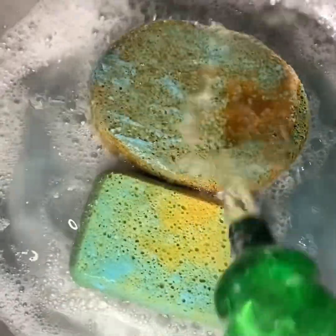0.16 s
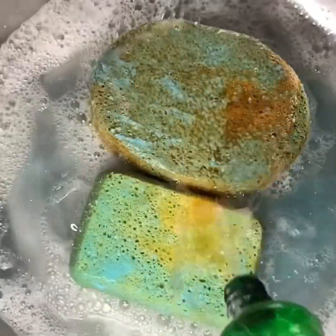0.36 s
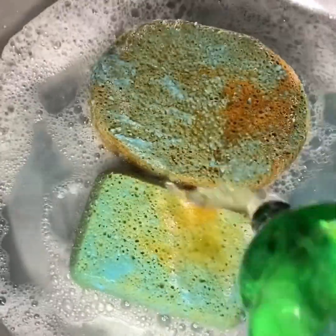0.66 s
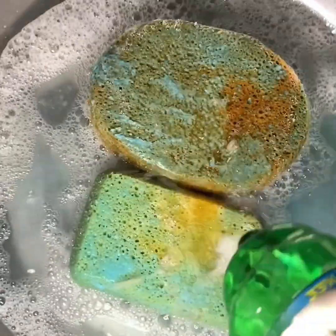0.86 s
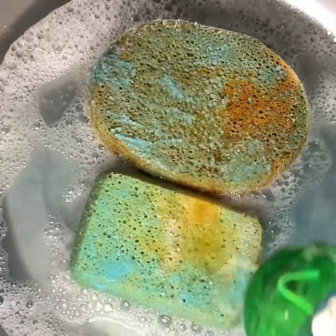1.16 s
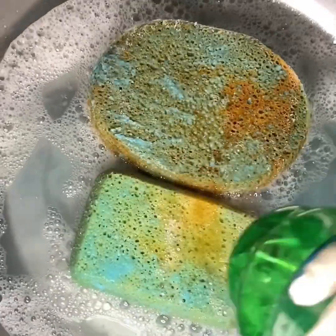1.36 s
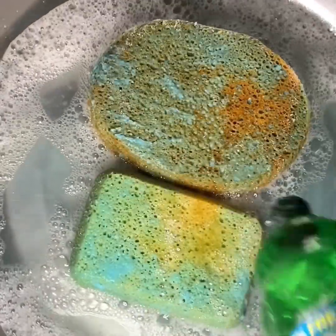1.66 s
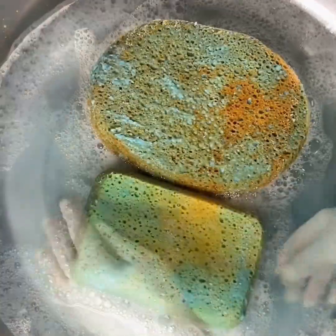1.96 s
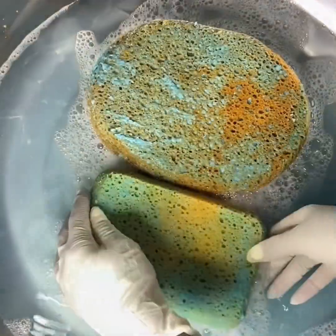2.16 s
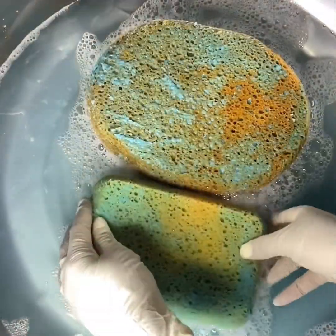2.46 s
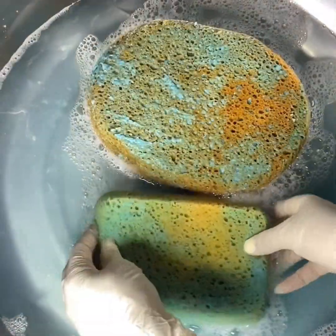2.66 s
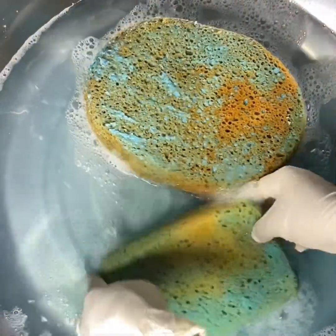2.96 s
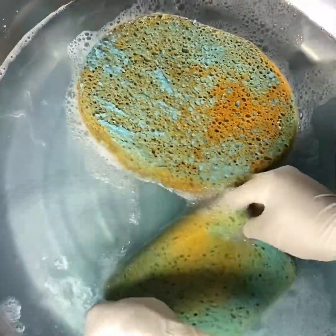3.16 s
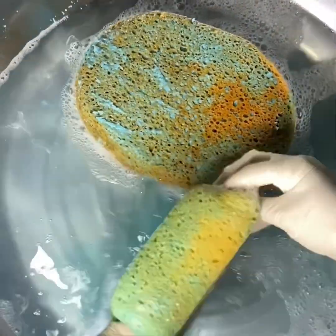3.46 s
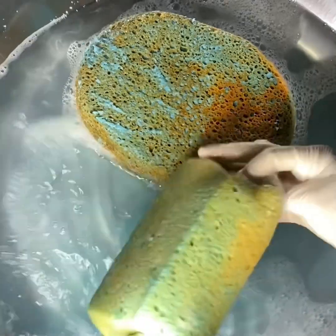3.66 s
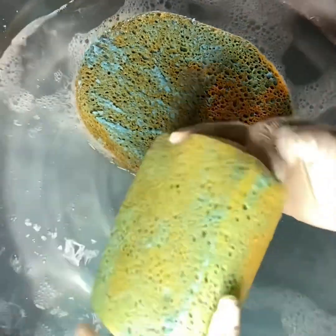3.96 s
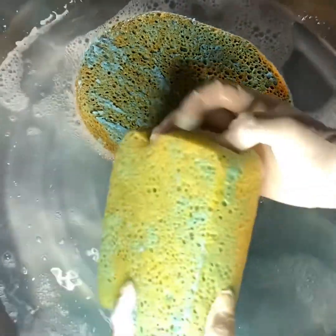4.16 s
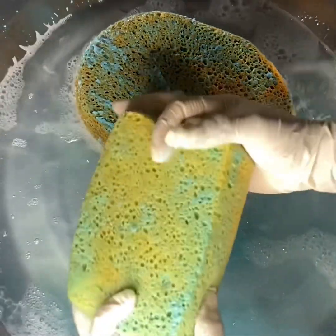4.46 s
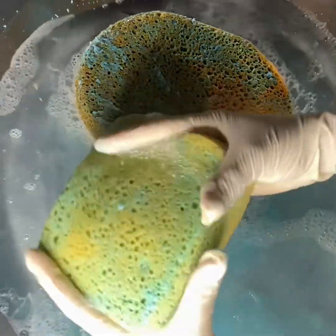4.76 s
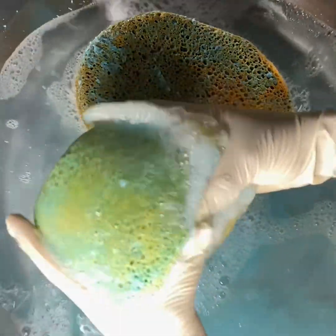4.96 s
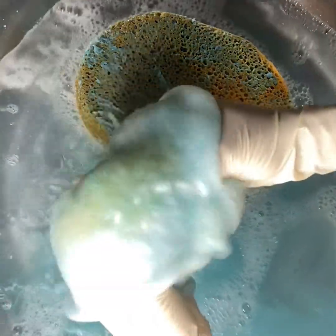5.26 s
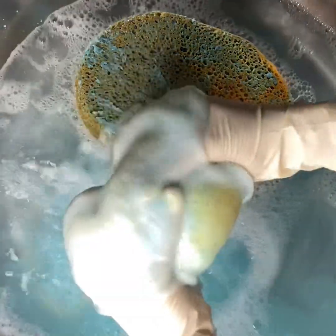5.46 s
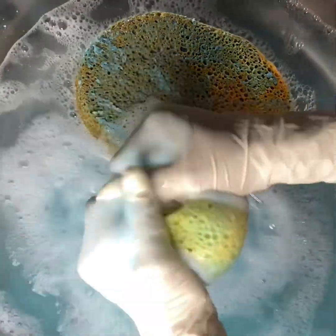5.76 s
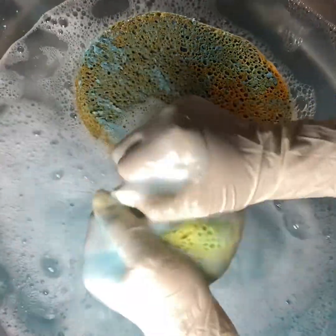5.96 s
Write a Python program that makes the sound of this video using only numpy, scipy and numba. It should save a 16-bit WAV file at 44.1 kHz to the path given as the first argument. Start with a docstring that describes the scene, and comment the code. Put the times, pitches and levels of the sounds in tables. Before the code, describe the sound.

Two short gushes of soap patter onto sponges in a sudsy tub, scattering quick, bright drips over a faint hiss. A plastic bottle gives a dull buzzing tap and is put down. A loud knock makes the basin ring shortly over a deep boom. After gentle sloshing, a saturated sponge is lifted and wrung: crackly foam, squelching and many drops and gurgling plops. Close stereo pickup, dry small room.

```python
"""Soap is poured on sponges in a plastic basin of suds: gushes spray, drops ring as bubbles and foam fizzes.
The hollow bottle taps, its walls buzzing, and is set down. A hand knocks the basin: its walls ring and the
panel and table answer low. Then a sponge is lifted and wrung: the fizz swells, more drops fall and air pockets plop.
Under it all the basin and table boom softly. Two close microphone ports hear it from above in a small room."""
import sys
import numpy as np
from scipy import signal
from scipy.fft import rfft, irfft
from scipy.io import wavfile
from scipy.ndimage import uniform_filter1d
from numba import njit

SR = 44100
rng = np.random.default_rng(int(sys.argv[2]) if len(sys.argv) > 2 else 0)


def store_pcm(level_fs):
    """Save levels as 16-bit WAV."""
    pcm = np.round(np.clip(level_fs, -1, 1) * 32767).astype(np.int16)
    wavfile.write(sys.argv[1], SR, np.atleast_2d(pcm).T)


N = 269451  # length in samples
TABLE_HZ = 62.8  # the pitch at which the table hums


def undb(db):
    """Turn decibels into a plain factor."""
    return 10 ** (np.asarray(db) / 20)


def unit(x):
    """Scale a signal to an average (RMS) level of 1."""
    return x / np.sqrt(np.mean(x ** 2))


def curves(table):
    """Join the points of each column by straight lines over time; the first column is seconds."""
    s, *columns = np.transpose(table)
    return [np.interp(np.arange(N) / SR, s, c) for c in columns]


def on_log(table, hz):
    """Read a table of (Hz, value) between its points, on a logarithmic pitch scale."""
    f, value = np.transpose(table)
    return np.interp(np.log(hz + 1), np.log(f + 1), value)


def shape(x, gain):
    """Filter by a gain that is a function of frequency."""
    hz = np.arange(len(x) // 2 + 1) * SR / len(x)
    return irfft(rfft(x) * gain(hz), len(x))


def band(x, hz, width):
    """Two-pole resonance, gain 1 at the centre."""
    b, a = signal.iirpeak(min(hz, .45 * SR), hz / width, SR)
    return signal.lfilter(b, a, x)


def band_twice(x, hz, width):
    """The same resonance twice in a row, for steeper sides."""
    return band(band(x, hz, width), hz, width)


def add(out, s, x):
    """Mix the sound x into out, starting at s seconds."""
    i = int(s * SR)
    out[i:i + len(x)] += x[:N - i]


def fade(t60, rise):
    """Quick rise, exponential fall by 60 dB in t60 seconds, top 1."""
    t = np.arange(int(t60 * SR) + 64) / SR
    env = (1 - np.exp(-t / rise)) * 1000 ** (-t / t60)
    return env / env.max()


def walk(rate):
    """Random levels held 1 / rate seconds, then smoothed into slopes; spread near 1."""
    k = int(SR / rate)
    steps = np.repeat(rng.standard_normal(N // k + 1), k)
    return 1.46 * uniform_filter1d(steps, k)[:N]


@njit
def rings(n, start, hz, t60, size, glide, rise, sr):
    """Damped tones; the pitch climbs by the share glide in one t60, as a bubble nears the surface."""
    out = np.zeros(n)
    for e in range(len(start)):
        length, phase = int(t60[e] * sr), 0.
        for i in range(min(length, n - start[e])):
            phase += 2 * np.pi * hz[e] * (1 + glide[e] * i / length) / sr
            swell = min(1., i / (rise * length + 1))
            out[start[e] + i] += size[e] * np.sin(phase) * 1000. ** (-i / length) * swell
    return out


def ring(s, hz, t60, db, glide=0., rise=0.):
    """Damped tones from lists or single values; rise is the share of the t60 over which each tone swells."""
    columns = np.broadcast_arrays(np.atleast_1d(s), hz, t60, db, glide)
    s, hz, t60, db, glide = (np.ascontiguousarray(v, float) for v in columns)
    return rings(N, (s * SR).astype(np.int64), hz, t60, undb(db), glide, rise, 1. * SR)


def foam(fizz_db, spray_db, slosh_db):
    """Foam cells burst over a flickering hiss, bigger bubbles squelch out of the pores; the slosh rings the basin water."""
    # Tone colour of the fizz. Each row: frequency in Hz, gain in dB
    fizz_color = [(300, -23), (1000, -22), (1500, -15), (2100, 3), (3000, 1), (5600, -2.5), (8000, -2),
                  (11000, -3.5), (15000, -13.5)]
    # Pore sizes at which the sponge wheezes. Each row: centre in Hz, width in Hz, level in dB
    pore_sizes = [(1310, 920, 11), (2050, 1100, -9.5), (3120, 7200, -7.5), (4830, 7300, 4),
                  (5800, 630, 3.5)]
    # Resonances of the water-filled basin. Each row: centre in Hz, width in Hz, level in dB
    basin_water = [(264, 92, -3), (317, 29, 6.5), (447, 42, 3.5), (605, 75, 0.5), (800, 210, -9.5)]

    cells = bubbles(1212, 13870, cycles=25.4, spread_db=0.85, count=20000)
    cells = shape(cells, lambda f: np.sqrt(f / 4000))
    hiss = undb(0.5 * walk(60)) * rng.standard_normal(N)
    fizz = shape(1.08 * unit(cells) + hiss, lambda f: undb(on_log(fizz_color, f)))
    top = shape(fizz, lambda f: 1 / (1 + (6500 / (f + 1)) ** 4))  # the treble part is the fine spray
    lower = fizz - top

    # the harder the squeeze, the larger the share of big bubbles
    big = bubbles(1100, 6300, cycles=25, spread_db=2.9, count=3600)
    big = unit(shape(big, lambda f: undb(.45 * on_log(fizz_color, f))))
    squelch = .75 * undb(.3 * (fizz_db + 56.5)) * big
    films = bubbles(1200, 9000, cycles=5, spread_db=2.8, count=1500)  # films tearing
    squelch += .35 * unit(films)
    squelch *= undb(2.2 * walk(25))  # they come in clusters

    # each size of pore empties in its own short surges
    pores = np.zeros(N)
    for hz, width, db in pore_sizes:
        for stretch in (0.86, 1.14):  # each size comes a little wider and a little narrower
            surge = undb(db + 3.8 * walk(17))
            pores += surge * band_twice(fizz, hz * stretch, width)
    body = 0.67 * unit(lower) + 0.5 * unit(pores) + squelch
    body *= undb(fizz_db + 0.81 * walk(16))

    gurgle = 0.65 * unit(bubbles(380, 1200, cycles=12, spread_db=2.2, count=1000))
    slosh = []
    for _ in range(2):  # one for both ports, one that they hear differently
        modes = [undb(db + 3.9 * walk(14)) * band(rng.standard_normal(N), hz, width)
                 for hz, width, db in basin_water]
        slosh.append(unit(sum(modes)))

    # the slosh fills the whole basin, so the ports share only part of it
    other = unit(np.roll(lower, N // 2)) * undb(fizz_db)
    other += unit(np.roll(top, N // 2)) * undb(spray_db)
    apart = 0.33 * undb(slosh_db) * slosh[1] + 0.17 * other
    water = body + undb(spray_db) * unit(top) + undb(slosh_db) * (slosh[0] + gurgle)
    return water, apart


def bubbles(low_hz, high_hz, cycles, spread_db, count):
    """A random swarm of ringing, rising bubbles, a few of them much louder than the rest."""
    when, pitch, ringing, size, glide = rng.random((count, 5)).T
    hz = low_hz * (high_hz / low_hz) ** pitch
    t60 = cycles * (1.22 + ringing) / hz
    db = -spread_db * np.log(size + 0.011)
    return ring(when * N / SR, hz, t60, db, 0.775 * glide, rise=0.016)


def drops(fizz_db):
    """Each drop lands with a slap, a treble snap and a small bubble whose pitch climbs."""
    # The clearest drops, and the bottle's first tick at 1.0357 s, which sounds the same way. Each row: start in
    # seconds, # bubble level in dB before the muting of hard drops, bubble pitch in Hz, treble snap level in dB
    clear_drops = [(.0145, -28, 2760, -37.5), (.103, -31.5, 5900, -38), (.217, -44, 2190, -69),
                   (.2568, -37.5, 4900, -53), (.3295, -56, 5330, -34), (.3985, -39, 5160, -56.5),
                   (.4394, -51, 3520, -40.5), (.598, -50, 5330, -23), (.6497, -45, 2500, -38.5),
                   (.6858, -44.5, 5230, -62), (.642, -47, 2540, -70), (.691, -50, 2400, -76),
                   (.738, -49, 3000, -70), (.7145, -58, 5500, -37), (.8215, -25, 3200, -26.5),
                   (.8275, -39, 6240, -38), (.842, -45, 5100, -45), (.8674, -43, 4360, -32),
                   (.877, -42, 3350, -64), (.8963, -36.5, 3290, -60), (.9966, -54, 4840, -42),
                   (1.026, -41.5, 6140, -61), (1.0357, -40, 2150, -56), (1.0362, -44, 3600, -60),
                   (1.094, -44, 5000, -52), (1.1483, -46.5, 5230, -40.5), (1.4773, -40, 5920, -48),
                   (2.021, -45.5, 2360, -55), (2.8383, -39, 3770, -53), (3.343, -45, 3800, -74),
                   (3.3866, -41.5, 4520, -49), (3.5607, -44, 5300, -50), (3.7812, -47, 3950, -59),
                   (3.8745, -40.5, 4860, -60), (4.109, -32, 5000, -32.5), (4.144, -36.5, 4140, -59),
                   (4.3749, -44, 4500, -70), (4.5694, -35.5, 4670, -56), (4.628, -40, 2450, -65),
                   (4.752, -41, 6140, -65), (4.8119, -37, 5260, -58), (4.8323, -34, 2460, -53),
                   (4.8757, -42, 2660, -37), (4.9012, -36, 2310, -62), (5.1307, -47, 2200, -60),
                   (5.1526, -40, 4470, -48), (5.1766, -43, 3270, -65), (5.2005, -36, 2580, -54),
                   (5.2319, -32, 2330, -45), (5.26, -26.5, 5400, -44), (5.4923, -36.5, 5040, -57),
                   (5.5377, -35.5, 4950, -55), (5.5762, -38, 2250, -67), (5.846, -46.5, 1520, -62),
                   (5.937, -46, 2060, -57), (3.4649, -36, 2150, -76), (3.6327, -21, 3780, -26.5),
                   (3.6763, -40, 1740, -55), (1.815, -52.5, 2160, -62), (4.975, -31, 2700, -44),
                   (5.03, -37, 2920, -61), (5.088, -39, 3530, -60), (5.29, -31, 2100, -37),
                   (3.7246, -39, 5370, -64), (3.8003, -34, 4660, -51), (3.9002, -39, 3170, -73),
                   (3.93, -34, 2180, -49), (3.968, -32, 5330, -49), (4.027, -37, 3000, -47),
                   (4.052, -30.5, 4800, -53.5), (4.4134, -40, 2270, -68), (4.469, -39, 2980, -70),
                   (4.4972, -32, 2080, -48), (4.5164, -30.5, 4800, -42.5), (4.5893, -31.5, 2420, -50),
                   (4.5372, -28, 2080, -35), (4.6611, -31, 2450, -45), (4.662, -32, 5940, -44),
                   (4.7785, -29.5, 3970, -44), (4.9228, -29.5, 2800, -48), (4.9921, -29.5, 2550, -69),
                   (5.059, -29.5, 5650, -43), (5.2664, -20.5, 4930, -28), (5.269, -30, 3230, -60),
                   (5.3014, -30, 1990, -49), (5.4191, -40, 2000, -64), (5.4507, -32, 2100, -59),
                   (5.5099, -32, 4850, -65), (5.597, -37.5, 2150, -64), (5.8351, -36, 4900, -46.5),
                   (6.0245, -35, 2360, -49)]
    rows = np.vstack([clear_drops, drizzle(fizz_db, count=18)])
    s, db, hz, snap_db = rows.T
    # hardness runs from 0 (snap 22 dB under the bubble) to 1 (only 3 dB under)
    hard = np.clip((snap_db - db + 22) / 19, 0, 1)
    slap_width = hz * (0.45 + 1.55 * hard)
    # a hard landing mutes and shortens the bubble
    out = ring(s, hz, 0.022 * (1 - 0.5 * hard), db - 10 * hard, 0.14, rise=0.1)

    # a landing clicks, then its spray dies away
    env = undb(-13) * fade(0.02, 0.0038)
    add(env, 0, fade(0.0016, 0.000084))
    noises = rng.standard_normal((len(rows), 2, len(env)))
    for row, width, noise in zip(rows, slap_width, noises):
        start, bubble_db, bubble_hz, treble_db = row
        slap = undb(bubble_db - 5) * unit(band_twice(noise[0], bubble_hz, width))
        snap = undb(treble_db) * unit(band_twice(noise[1], 9500, 6500))
        add(out, start, env * (slap + snap))
    return out


def drizzle(fizz_db, count):
    """Lesser drops, in rows like the clear ones: the louder the fizz, the more often they fall."""
    when, pitch, size = rng.random((count, 3)).T
    share = np.cumsum(undb(fizz_db))
    i = np.searchsorted(share, when * share[-1])
    db = fizz_db[i] + 13 - 0.45 * np.log(size + 0.27)
    hz = 1900 * (5400 / 1900) ** pitch
    return np.transpose([i / SR, db, hz, db - 20])  # the snap lies 20 dB under the bubble


def plops():
    """Air pockets leaving the sponge ring lower than the drops, with a short overtone just after."""
    # Each row: start in seconds, level in dB, bubble pitch in Hz, share by which the pitch rises
    air_pockets = [(.708, -45, 1700, 0.3), (0.71, -50, 950, 0.18), (.755, -48, 1220, 0.45),
                   (3.332, -44.5, 1050, 0.72), (3.333, -41, 755, 0.079), (3.838, -35, 565, 0.17),
                   (3.839, -31.5, 1325, 0.11), (3.873, -47, 566, 0.16), (3.968, -39, 532, 0.3),
                   (4.035, -45, 534, 0.2), (4.112, -43, 522, 0.45), (4.216, -42, 1140, 0.1),
                   (4.377, -45, 560, 0.18), (4.375, -41.5, 1150, .1), (4.543, -43.5, 340, 0.045),
                   (5.132, -48, 480, 0.083), (5.233, -38, 1400, .1), (4.538, -36.5, 755, 0.064),
                   (4.702, -44, 566, 0.13), (4.813, -41, 552, 0.22), (5.373, -44, 325, 0.36),
                   (5.4, -39.5, 627, 0.38), (5.425, -43, 320, 0.2), (5.463, -41, 417, 0.14),
                   (5.666, -47.5, 413, 0.11), (5.72, -52, 437, .1), (5.985, -43, 380, 0.083),
                   (5.982, -42, 890, 0.044)]
    s, db, hz, glide = np.transpose(air_pockets)
    t60 = 17 / hz * (1 + 3.6 * glide)  # pockets that climb far ring longer
    main = ring(s, hz, t60, db, glide, rise=0.057)
    overtone = ring(s + 0.00115, 2.165 * hz, 0.22 * t60, db - 2, glide, rise=0.03)
    return main + overtone


def splashes():
    """Gushes land on the sponge as ragged bursts of spray, torn into spikes by single droplets."""
    # Each row: start in seconds, level in dB, centre in Hz, time to fall by 60 dB in seconds
    gushes = [(0.0093, -43, 2930, 0.055), (.092, -53, 4960, 0.069), (0.1104, -44, 5340, 0.21),
              (0.7136, -56, 2880, 0.11), (.806, -63, 4500, .05), (0.814, -39, 5270, 0.043),
              (0.8205, -40.5, 4630, 0.026), (0.824, -40, 6000, 0.14), (.885, -54, 3530, 0.033),
              (0.896, -40.5, 4600, 0.041), (1.1316, -45, 6160, 0.14), (1.681, -52, 2600, 0.11)]
    out = np.zeros(N)
    spray = undb(3.5 * walk(500)) * rng.standard_normal(N)
    for s, db, hz, t60 in gushes:
        env = fade(t60, rise=.002)
        burst = spray[int(s * SR):][:len(env)]
        add(out, s, undb(db) * env * unit(band_twice(burst, hz, 1.2 * hz)))
    return out


def knocks():
    """A rattling contact rings the walls, brighter the harder the blow; the heavy panel and table answer late."""
    # Blows on the basin. Each row: start in seconds, floor panel level in dB, wall level in dB,
    # table level in dB, lag of the low ring in seconds
    blow_list = [(1.6911, -28, -29.5, -76, 0.0021), (1.732, -45, -56, -69, 0.0044),
                 (1.789, -40.5, -60, -68, 0.00055), (1.829, -51, -58, -70, 0.0017),
                 (2.0706, -13.5, -18, -68, 0.0027), (2.943, -31.5, -37, -48, 0.0022),
                 (3.836, -41, -34.5, -65, 0.0066), (4.123, -38, -34, -45, 0.0035)]
    # Tones of the basin wall. Each row: pitch in Hz, level in dB against the blow,
    # time to fall by 60 dB in seconds
    wall_tones = [(322, -15, 0.094), (605, -8, 0.079), (673, -19.5, 0.18), (796, 4, 0.021),
                  (1030, -6, 0.018), (1564, 6.5, 0.0094), (1040, -22, 0.15), (1530, -22.5, 0.2),
                  (1660, -21, 0.16), (2393, -20.5, 0.1), (2360, -5, 0.015), (2950, -32, 0.126),
                  (3670, -29, 0.087), (3940, -31.5, 0.084), (4780, -37, 0.11), (5600, -27, 0.106)]
    out = np.zeros(N)
    hz, db, t60 = np.transpose(wall_tones)
    contact, tail = fade(.022, .002), fade(.18, .004)
    flutter = undb(2.5 * walk(300))  # water lapping the walls makes their ring ragged
    for s, panel_db, wall_db, table_db, lag in blow_list:
        noise = rng.standard_normal(len(tail))
        wall = ring(s + 1.33 / hz, hz, t60, db + wall_db, rise=0.078) * flutter  # the treble arrives first
        add(wall, s, undb(wall_db - 4.0) * contact * noise[:len(contact)])
        add(wall, s, undb(wall_db - 13.5) * tail * band(noise, 670, 4600))
        # two panel tones that beat with each other, then the table
        low = ring(s + lag, [145, 166, TABLE_HZ], [.17, 0.098, .3],
                   [panel_db, panel_db - 3, table_db], rise=0.051)
        hard_hz = min(4800 * undb(1.2 * (wall_db + 19.5)), 15000)  # treble limit
        b, a = signal.butter(2, hard_hz, fs=SR)
        out += signal.lfilter(b, a, wall)
        out += band(band(low, 184, 231), 188, 300)
    return out


def bottle():
    """The hollow bottle touches, then taps; the blow spreads through the walls, treble first, and they buzz out."""
    # Tones of the bottle. Each row: pitch in Hz, level in dB against the tap,
    # time to fall by 60 dB in seconds
    bottle_tones = [(314, -13, 0.06), (567, -2, 0.035), (855, 5.5, 0.029), (1034, 11, 0.014),
                    (1300, -0.5, .02), (1730, 4, 0.016), (2450, 5.5, 0.005), (3400, 1, 0.03),
                    (4080, -5.5, 0.0065), (5140, -13.5, 0.0047)]
    # Each row: start in seconds, level in dB to which each part adds its own offset
    taps = [(1.0475, -40), (1.0527, -18.5)]
    hz, db, t60 = np.transpose(bottle_tones)
    out = np.zeros(N)
    tail, crack = fade(0.037, 0.0028), fade(0.028, .0012)
    for s, tap_db in taps:
        out += ring(s + 0.35 / hz, hz, t60, db + tap_db - 5.0, rise=0.076)
        noise = rng.standard_normal(len(tail))
        buzz = band(band(noise, 650, 1600), 700, 2500)
        add(out, s, undb(tap_db - 3.0) * tail * buzz)
        add(out, s, undb(tap_db - 29.0) * crack * band(noise[-len(crack):], 3700, 3000))
    return out


def boom():
    """Moving water shakes the floor panel of the basin; the table under it hums on one wavering mode."""
    # Levels of the two low hums. Each row: time in seconds, floor panel level in dB, table level in dB
    hum_levels = [(0, -58.5, -60.5), (.68, -66.5, -75), (.9, -61.5, -55.5), (1.3, -64.5, -71),
                  (1.63, -59, -82), (1.74, -44.5, -74), (1.78, -63, -68), (1.86, -59, -70),
                  (1.89, -59, -70), (1.93, -62, -76), (2.4, -54, -63), (2.79, -57, -62),
                  (2.935, -51.5, -71), (2.98, -55, -40), (3.04, -53, -41), (3.11, -51.5, -47.5),
                  (3.3, -53, -68), (4.0, -53, -62), (4.14, -55.5, -48), (4.25, -68.5, -71.5),
                  (4.49, -60.5, -60), (4.6, -65, -70), (4.92, -62.5, -69), (5.33, -61.5, -57.5),
                  (5.6, -60.5, -69), (6.11, -66, -65)]
    panel_db, table_db = curves(hum_levels)
    push = rng.standard_normal((3, N))
    panel = band(band(push[0], 124.8, 26) + band(push[1], 140.0, 27.8), 87, 170)
    hum = np.sin(2 * np.pi * np.cumsum(TABLE_HZ + 1.5 * walk(11)) / SR)
    table = hum + 0.27 * unit(band_twice(push[2], 48, 40))
    panel_level = undb(panel_db + 1.23 * walk(15))
    table_level = undb(table_db + 0.72 * walk(14))
    return panel_level * unit(panel) + table_level * unit(table)


def small_room(sound):
    """The room answers with a short tail of filtered noise, in two independent versions."""
    echo = fade(.16, 0.0082)
    echo = echo * band(rng.standard_normal((2, len(echo))), 1500, 5600)
    echo /= np.sqrt(np.sum(echo ** 2) / 2)
    return undb(-21) * signal.fftconvolve([sound], echo, axes=1)[:, :N]


def two_ports(rest, apart, blows):
    """The ports differ in timing and level by pitch; the rim sends the ring of blows around 800 Hz to the right
    first."""
    # Each row: frequency in Hz, phase in radians by which the left port leads
    port_lead = [(0, 0), (250, -.2), (700, -.7), (1300, -.5), (2000, 0), (2600, .6), (4400, .8),
                 (5050, -.1), (5600, .5), (6900, 3), (8100, 3.5), (9800, 6.1), (11600, 6.6), (12700, 9.1),
                 (14600, 9.7), (15600, 12.4)]
    # Each row: frequency in Hz, level of left minus right in dB
    port_shade = [(200, -.1), (400, 0.3), (750, -1.5), (1300, 0), (2400, -.8), (8000, .2)]

    def rim(f):
        """How strongly the rim acts: a hump around 800 Hz."""
        return np.exp(-(np.log((f + 1) / 800) / 0.36) ** 2)

    # the rim makes the left port up to 4 dB softer and 0.9 radians later
    left_blows = shape(blows, lambda f: undb(-4 * rim(f)) * np.exp(-1j * .9 * rim(f)))
    left = rest + apart + left_blows
    left = shape(left, lambda f: undb(on_log(port_shade, f)))
    right = rest - apart + blows
    right = shape(right, lambda f: np.exp(-1j * np.interp(f, *np.transpose(port_lead))))
    return np.array([left, right])


def scene():
    """Mix water, blows, low hums and room into the two ports."""
    # Foam and running water. Each row: time in seconds, fizz level in dB, fine spray level in dB,
    # slosh level in dB
    water_levels = [(0, -62, -55, -63.5), (.27, -62.5, -61, -68.5), (.37, -74, -63, -73),
                    (.67, -68.5, -61, -70.5), (.79, -61.5, -53, -63.5), (.94, -68, -50, -72.5),
                    (1.03, -64.5, -64.5, -68), (1.28, -76.5, -62.5, -79), (2.04, -71.5, -69.5, -71),
                    (2.22, -70.5, -69.5, -69), (2.42, -80, -77.5, -70), (2.56, -70, -69, -66),
                    (2.75, -66.5, -68.5, -65.5), (3.35, -67, -68, -69), (3.74, -62, -60, -64),
                    (3.98, -55, -61.5, -59), (4.2, -53.5, -57.5, -61), (4.29, -62.5, -67.5, -68.5),
                    (4.44, -57, -59, -65.5), (4.72, -56.5, -60, -64), (4.9, -51.5, -56.5, -64),
                    (5.22, -52, -54, -59), (5.38, -49.5, -46.5, -56.5), (5.5, -52.5, -55, -54),
                    (5.6, -58, -63.5, -59.5), (5.86, -65, -66, -68), (5.93, -70.5, -73.5, -67),
                    (5.995, -66, -68, -62), (6.045, -52, -53, -62)]
    flow = curves(water_levels)
    blows = knocks() + bottle()
    wet = splashes() + drops(flow[0]) + plops()
    room = small_room(blows + wet)
    water, apart = foam(*flow)
    apart = apart + 0.87 * room[1]  # part of the echo differs between the ports
    rest = wet + room[0] + water + boom()
    return two_ports(rest, apart, blows)


def record(dry):
    """The microphone drops the deepest bass and the recorder cuts the top."""
    bass_cut = signal.butter(4, 40, "high", fs=SR, output="sos")
    top_cut = signal.ellip(10, .2, 50, 15650, fs=SR, output="sos")
    return signal.sosfilt(top_cut, signal.sosfilt(bass_cut, dry))


dry = scene()
out = record(dry)
store_pcm(out)
```